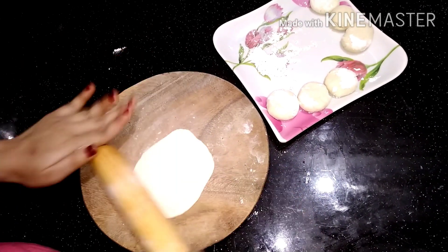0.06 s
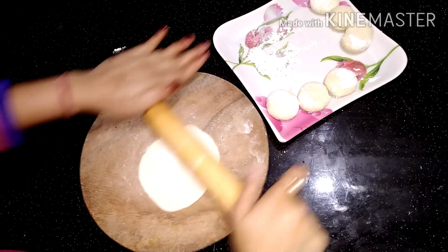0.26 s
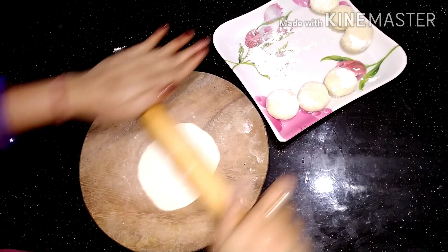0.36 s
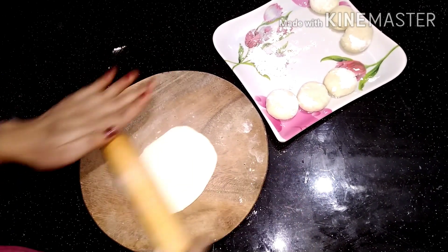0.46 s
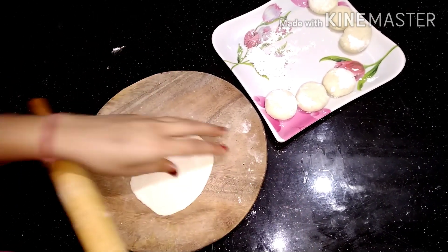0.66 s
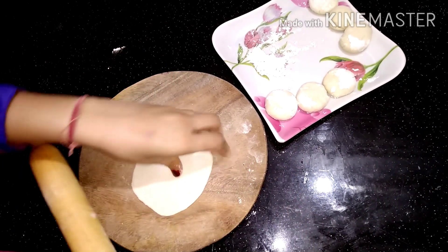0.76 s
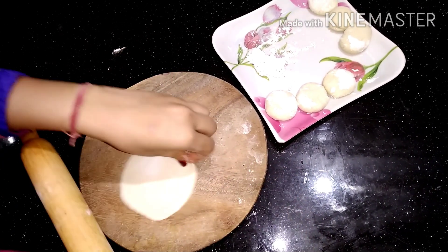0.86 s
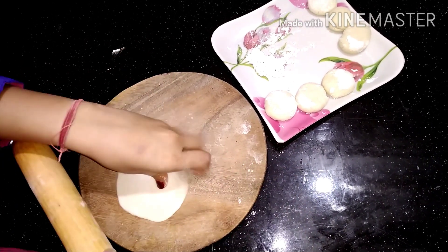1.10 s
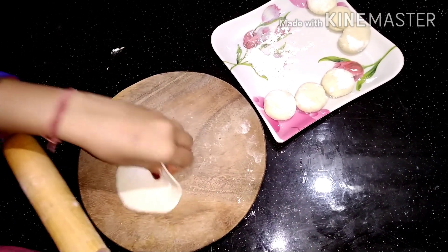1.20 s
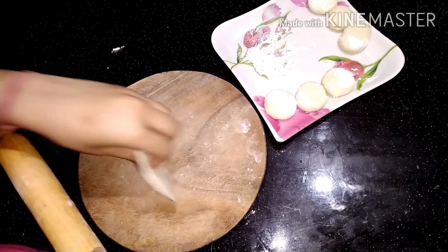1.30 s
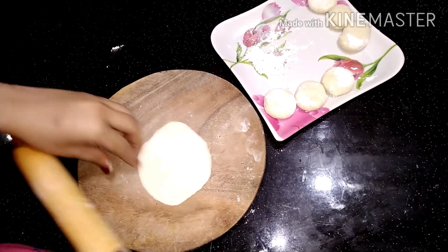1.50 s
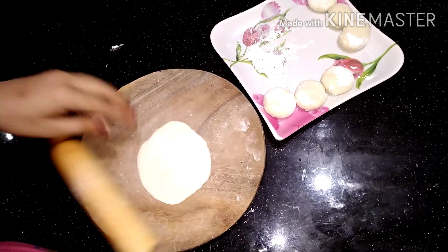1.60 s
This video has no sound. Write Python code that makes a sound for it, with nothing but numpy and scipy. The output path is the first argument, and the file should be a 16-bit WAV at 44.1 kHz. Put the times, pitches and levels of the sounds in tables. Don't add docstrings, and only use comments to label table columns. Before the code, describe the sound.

Close up in a small quiet kitchen, a rolling pin thuds hard on a board, trundles with low counter rumble, knocks again midway, and ends with bright clicks and a short rattle.

```python
import sys
import numpy as np
from scipy import signal
from scipy.fft import rfft, irfft, next_fast_len
from scipy.io import wavfile
from scipy.ndimage import uniform_filter1d

SR = 44100
rng = np.random.default_rng(int(sys.argv[2]) if len(sys.argv) > 2 else 0)


def nominal_scale(level):
    x = np.asarray(level, float) / 20
    return 10 ** x


def to_wav(sig):
    pcm = np.clip(np.atleast_2d(sig), -1, 1) * 32767
    pcm = np.round(pcm).astype(np.int16)
    wavfile.write(sys.argv[1], SR, pcm.T)


N = 72765


def rms_one(x):
    return x / np.sqrt(np.mean(x ** 2) + 1e-20)


def above(x, hz):
    return signal.sosfilt(signal.butter(2, hz, "high", fs=SR, output="sos"), x)


def resonance(hz, decay):
    return [1, -2 * decay * np.cos(2 * np.pi * hz / SR), decay * decay]


def ring(force, modes):
    out = 0
    for k, (hz, db, t60, pan_db) in enumerate(modes):
        strike = [0, np.sin(2 * np.pi * hz / SR)]
        tone = signal.lfilter(strike, resonance(hz, nominal_scale(-60 / (t60 * SR))), force + 1e-18)
        sides = nominal_scale(db + pan_db * np.array([[0.5], [-0.5]]))
        out = out + sides * tone * (-1) ** (k * (hz > 1000))
    return out


def pushes(times, levels_db, lengths_ms):
    out = np.zeros(N + SR)
    for s, db, ms in zip(times, levels_db, lengths_ms):
        part = (np.arange(800) - s * SR % 1) / (ms * SR / 1000)
        shape = np.sin(np.pi * np.clip(part, 0, 1)) ** 2
        first = int(s * SR)
        out[first:first + 800] -= nominal_scale(db) * shape / shape.sum()
    return out[:N]


# frequency in Hz, level in dB, t60 in seconds, left over right in dB.
BOARD_LOW_MODES = [(193.3, -13, 0.24, 1), (256.4, -13, 0.12, -1.5), (312.3, 2.5, 0.042, -1.5),
                   (342.3, -11.5, 0.17, -2), (385, -6.5, 0.14, 0.5)]
# frequency in Hz, level in dB, t60 in seconds, left over right in dB.
BOARD_MODES = [(517, 3, 0.075, 1.5), (545.7, -15.5, 0.12, 14), (575.8, 4, 0.068, -4.5),
               (600.5, -6.5, 0.15, 6), (660, -21, 0.055, 6), (864, -26, 0.074, -24)]
# frequency in Hz, level in dB, t60 in seconds, left over right in dB.
PIN_MODES = [(1194, -8, 0.041, -15.5), (1351, -2.5, 0.046, -14.5), (1386, -7, 0.031, 6.5),
             (1688, -18, 0.055, 18)]
# frequency in Hz, level in dB, t60 in seconds, left over right in dB.
PIN_HIGH_MODES = [(1905, -8, 0.034, -10), (2202, -8.5, 0.022, 19), (2430, -20, 0.051, -32),
                  (2730, -18.5, 0.052, 31), (3000, -10.5, 0.034, -15.5), (3297, -8.5, 0.056, -7),
                  (3390, -1, 0.015, 0.5), (3700, -9.5, 0.025, 13.5), (4516, -10.5, 0.055, 9),
                  (4950, -14.5, 0.0031, -43.5)]
# frequency in Hz, level in dB, t60 in seconds, left over right in dB.
COUNTER_MODES = [(74.6, -28, 0.099, -2), (92.35, -3, 0.46, 1.5), (113.4, -5, 0.39, -.5),
                 (132.6, -8, 0.57, 3.5), (149, -13.5, 0.11, 2.5)]
# start in seconds, level in dB, contact in ms,
# weight on the board's low modes in dB, weight on the pin in dB.
KNOCKS = [(0.063, -56, 0.31, 9.5, -5), (0.2054, -12.5, 2.144, -6, -23.5), (.253, -39, 1.74, 4, -15),
          (.293, -40, 2.7, -0.5, -20), (.31, -45.5, 1.3, 0, -17), (.362, -46, 2, -32, -20),
          (.486, -54, 0.7, 10.5, -3), (0.496, -47.5, 1.5, -16, 6), (0.51, -54, 1.7, -16, -22),
          (0.7632, -41, 0.73, -22, -5.5), (0.796, -42, 1.67, -19, 1), (.806, -37.5, 0.61, -9.5, -7),
          (.838, -57, 1, -30, 13), (.853, -47.5, 0.4, -28, 1.5), (1.023, -25.5, 1.29, -12, -9),
          (1.071, -40, 0.3, -32, -2), (1.105, -46, 0.45, -12, 2.5), (1.128, -50, 0.77, -20, -4),
          (1.535, -44, 0.9, 3, 7), (1.551, -47.5, 1.03, -12, 16.5), (1.0268, -34, 1.13, -30, -23),
          (.326, -46, 2.05, -20, -27), (.06, -56, 1.3, -5, -12)]


def knocks():
    s, db, ms, low_db, pin_db = np.transpose(KNOCKS)
    late_s, slow_ms = 0.01545, 11.15
    low = ring(pushes(s, db + low_db, ms), BOARD_LOW_MODES)
    board = ring(pushes(s, db, ms), BOARD_MODES)
    pin = ring(pushes(s, db + pin_db, 0.3 * ms), PIN_MODES)
    pin = pin + ring(pushes(s, db + pin_db - 4.5, 0.34 * ms), PIN_HIGH_MODES)
    counter = ring(pushes(s + late_s, db + low_db, 0 * ms + slow_ms), COUNTER_MODES)
    return low, board, pin, counter


# start in seconds, level in dB, fading in dB per second,
# weight on the pin's lower modes in dB, weight on its high modes in dB.
ROLLS = [
    (0.005, -64, 45, -56, -5),
    (0.229, -47, 101, -36, -18),
    (.275, -61.5, 84, -3.5, -13),
    (0.479, -59.5, 55, -26, -3.5),
    (0.763, -50.5, 102, -28, -9.5),
    (0.827, -65, 172, 12.5, 5.5),
    (1.059, -46.5, 123, -2.5, -8.5),
    (1.14, -74, 131, -30, -31),
    (1.525, -46, 180, 3.5, 4.5),
    (1.568, -60, 62, -35, -37),
]


def chatter():
    contacts_per_s, spread_db, attack_ms = 600, 2, 0.83
    start, db, fade, pin_db, high_db = np.transpose(ROLLS)[:, :, None]
    age = np.maximum(np.arange(N) / SR - start, 0)
    level = nominal_scale(db - fade * age) * np.minimum(age * 1000 / attack_ms, 1)
    sizes = nominal_scale(spread_db * np.minimum(rng.exponential(1, (3, N)), 3))
    sizes = sizes * rng.choice([-1, 1], (3, N))
    soft, firm, hard = sizes * (rng.random(N) < contacts_per_s / SR)
    soft = signal.sosfilt(signal.butter(4, 625, fs=SR, output="sos"), soft + 1e-18)

    def driven(force, weight_db, modes):
        strength = (level * nominal_scale(weight_db)).sum(0)
        return ring(force * strength, modes) / np.std(ring(force, modes))

    low_db = -3.5 - 0.1894 * (pin_db + 3.0)
    low = driven(soft, low_db, BOARD_LOW_MODES)
    board = driven(soft, 0, BOARD_MODES)
    pin = driven(firm, pin_db, PIN_MODES) + driven(hard, high_db, PIN_HIGH_MODES)
    return low, board, pin


# start in seconds, frequency in Hz,
# level in dB, t60 in ms.
TICKS = [(0.2067, 2800, -41.5, 8), (0.2062, 4200, -39, 16), (0.2072, 3405, -38.5, 15),
         (0.4965, 418, -35.5, 49), (0.497, 1323, -37.5, 21), (.498, 853, -44, 21), (.534, 1730, -51, 36),
         (.762, 2220, -53, 16), (.796, 3000, -44.5, 55), (0.844, 3150, -47.5, 65), (1.0224, 3000, -41, 11),
         (1.0236, 12000, -35, 2.8), (1.027, 2240, -43.5, 27), (1.066, 3085, -48.5, 105),
         (1.0797, 1470, -36.5, 22), (1.141, 1330, -41, 30), (1.16, 1360, -50.5, 110),
         (1.168, 579, -47, 115), (1.524, 2600, -35.5, 9.8), (1.53, 3930, -23, 7.9), (1.53, 1560, -35, 9.7),
         (1.5342, 2480, -22.5, 7.5), (1.5355, 590, -46.5, 22), (1.542, 2520, -40, 25),
         (1.551, 3000, -42, 15), (1.551, 644, -34, 31), (1.577, 2410, -46, 22), (1.595, 1310, -41, 36),
         (1.609, 1318, -53, 66), (.52, 1330, -56, 38), (1.145, 3150, -56.5, 36), (1.085, 3220, -56, 30)]


def ticks():
    out = 0
    for s, hz, db, ms in TICKS:
        partials = [(hz, 0, ms / 1000, -4), (1.12 * hz, -5, ms / 1000, 1.5)]
        out = out + ring(pushes([s], [db], [min(0.12, 400 / hz)]), partials)
    return out


# start in seconds, level in dB.
PRESSES = [
    (0.027, -41),
    (.084, -38),
    (0.132, -42),
]
# start in seconds, level in dB.
SWAYS = [
    (.001, -66),
    (.215, -50),
    (.8, -69),
    (1.04, -69),
]


def presses():
    s, db = np.transpose(PRESSES)
    sway_s, sway_db = np.transpose(SWAYS)
    thuds = ring(pushes(s, db, 0 * s + 3.2), [(130.7, 0, 0.14, 0)])
    return thuds + ring(pushes(sway_s, sway_db, 0 * sway_s + 24.0), [(58.44, 0, 5.3, 0)])


# time in seconds, level in dB.
LOAD = [(0.0, -43), (0.17, -52.5), (0.25, -35.5), (.38, -39), (.45, -35.5), (.565, -46.5), (.6, -40),
        (.7, -50), (.76, -52), (.8, -49), (.89, -49.5), (.955, -54.5), (1.04, -59), (1.12, -47.5),
        (1.33, -53.5), (1.48, -69), (1.58, -63), (1.65, -56)]


def rumble():
    load_db = np.interp(np.arange(N) / SR, *np.transpose(LOAD))
    modes = [(hz, 1.9 * db, 0.9 * t60, pan_db) for hz, db, t60, pan_db in COUNTER_MODES]
    boom = rms_one(ring(rng.standard_normal(N + SR), modes)[:, SR:])
    boom = signal.sosfilt(signal.butter(2, 142, fs=SR, output="sos"), boom)
    even = int(0.06 * SR)
    strength = uniform_filter1d(uniform_filter1d((boom ** 2).mean(0), even), even)
    return nominal_scale(load_db - 3.5) * boom / np.sqrt(strength + 0.077)


def drift(rate_hz):
    r = np.exp(-2 * np.pi * rate_hz / SR)
    return rms_one(signal.lfilter([1], [1, -2 * r, r * r], rng.standard_normal(N + SR))[SR:])


def banded_noise(spectrum, patchy_db):
    out, edges = 0, 30 * 2 ** np.arange(0, 9.3, 1 / 3)
    white = rng.standard_normal((2, 2, N))
    at_hz, level_db = np.transpose(spectrum)
    for k, (low, high) in enumerate(zip(edges, edges[1:])):
        band = signal.butter(2, [low, high], "band", fs=SR, output="sos")
        mid, side = signal.sosfilt(band, white[k % 2])
        hz = np.sqrt(low * high)
        alike = 1 / (1 + (hz / 229) ** 2)
        gain = nominal_scale(np.interp(np.log(hz), np.log(at_hz), level_db) + patchy_db * drift(2.4))
        out = out + gain * (np.sqrt(1 + alike) * mid + np.sqrt(1 - alike) * side * [[1], [-1]])
    return rms_one(out)


# start in seconds, length in seconds, level in dB.
STROKES = [(-.04, 0.17, -61.5), (0.045, 0.18, -62.5), (0.192, 0.07, -63.5), (0.204, 0.2, -66.5),
           (0.388, 0.18, -64), (0.474, 0.27, -65), (0.742, 0.093, -63), (0.766, 0.2, -64),
           (0.923, 0.42, -70), (1.036, 0.089, -62.5), (1.127, 0.097, -65.5), (1.2, 0.095, -69),
           (1.24, 0.18, -68), (1.523, 0.062, -53.5), (1.567, 0.15, -66)]
# frequency in Hz, level in dB per Hz.
STROKE_COLOUR = [(530, -67), (900, -7.5), (1330, -0.5), (2340, -2), (3150, -2.5), (5250, -0.5),
                 (6990, -11.5), (12200, -0.5), (15500, -1)]


def rubbing():
    rise_share, louder_db = 0.22, 6
    start, length, db = np.transpose(STROKES)[:, :, None]
    part = np.clip((np.arange(N) / SR - start) / length, 0, 1)
    swell = np.minimum(part / rise_share, (1 - part) / (1 - rise_share))
    level = np.sqrt((nominal_scale(db + louder_db) ** 2 * swell ** 1.33).sum(0))
    grain = nominal_scale(1.43 * drift(63))
    sides = nominal_scale(np.array([[-1.5], [1.5]]))
    return level * grain * banded_noise(STROKE_COLOUR, patchy_db=2.2) * sides


def kitchen(x):
    t60_s, cut_hz = 0.36, 3400
    size = next_fast_len(N + SR)
    w = 2 * np.pi * np.arange(size // 2 + 1) / size
    dull = 1 / (1 + 1j * w * SR / (2 * np.pi * cut_hz))
    out = np.zeros((2, len(w)), complex)
    for k, lag in enumerate(rng.uniform(0.008, 0.03, 16) * SR):
        loop = nominal_scale(-60 * lag / SR / t60_s) * dull * np.exp(-1j * w * lag)
        out[k % 2] += loop / (1 - loop) * (-1) ** (k // 2)
    return irfft(out * rfft(x, size), size)[:, :N]


# frequency in Hz, width in Hz, level in dB.
WHINE = [
    (330, 100, -72),
    (3000, 123, -69),
    (3235, 65, -69.5),
    (5060, 610, -69.5),
]


def whine():
    out = 0
    for hz, width_hz, db in WHINE:
        noise = rng.standard_normal((1 + (hz > 1000), N))
        tone = signal.lfilter([1, 0, -1], resonance(hz, np.exp(-np.pi * width_hz / SR)), noise)
        out = out + nominal_scale(db) * rms_one(tone)
    return out


# frequency in Hz, level in dB per Hz.
AIR_COLOUR = [(18, -58), (30, -8), (170, -5.5), (480, -11), (748, -14), (2430, -26), (3070, -54),
              (4200, -26.5), (15500, -24)]


def air():
    return nominal_scale(-64.5) * banded_noise(AIR_COLOUR, patchy_db=-0.2)


def at_microphones(x, lag_ms):
    left = np.interp(np.arange(N) - lag_ms * SR / 1000, np.arange(N), x[0])
    return np.array([left, x[1]])


def scene():
    board_edge_hz, pin_edge_hz = 215, 1074
    low, board, pin, counter = knocks()
    low_roll, board_roll, pin_roll = chatter()
    low = above(low + low_roll, board_edge_hz)
    upper = above(board + board_roll, 2 * board_edge_hz) + above(pin + pin_roll, pin_edge_hz)
    upper = upper + above(ticks(), 400)
    wood = at_microphones(low, 0.2) + at_microphones(upper, 0.373)
    wood = wood + nominal_scale(-13.5) * kitchen(above(upper.mean(0), 610))
    counter = above(above(counter, 49), 49)
    return wood + counter + presses() + rumble() + rubbing() + air() + whine()


def low_pass(x):
    return signal.sosfilt(signal.butter(12, 15690, fs=SR, output="sos"), x)


def record(dry):
    notch_hz, notch_width_hz, notch_depth = 7830, 830, 0.57
    peak = signal.iirpeak(notch_hz, notch_hz / notch_width_hz, fs=SR)
    dry = dry - notch_depth * signal.lfilter(*peak, dry)
    top = signal.cheby2(10, 50, 16150, fs=SR, output="sos")
    mix = signal.sosfilt(top, above(above(dry, 52), 52))
    return low_pass(mix)


dry = scene()
out = record(dry)
to_wav(out)
```